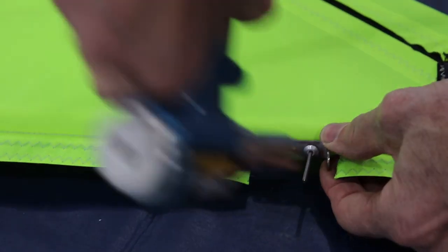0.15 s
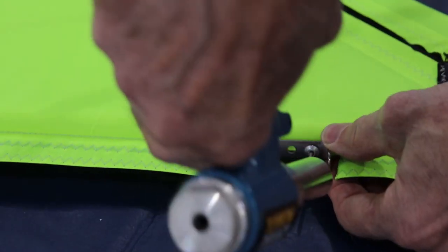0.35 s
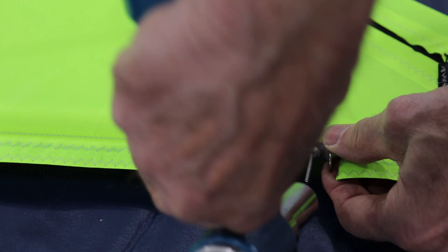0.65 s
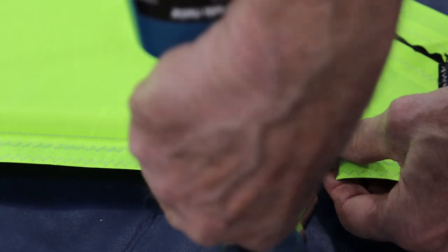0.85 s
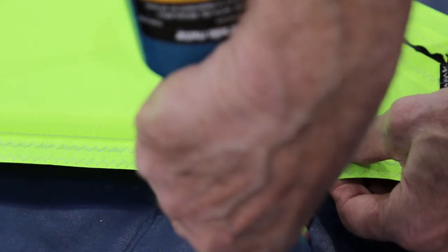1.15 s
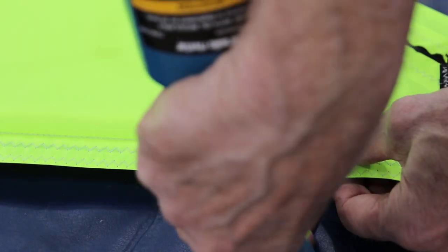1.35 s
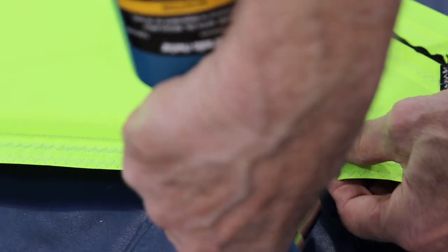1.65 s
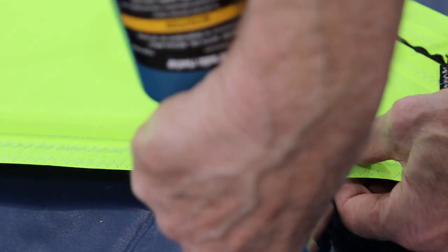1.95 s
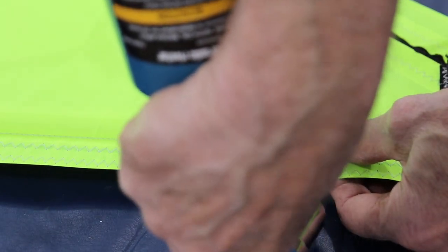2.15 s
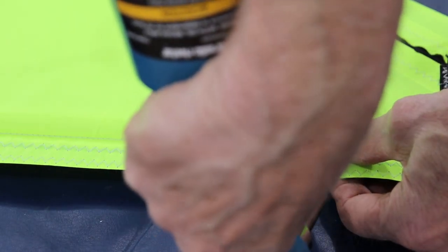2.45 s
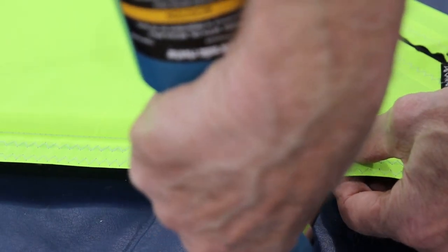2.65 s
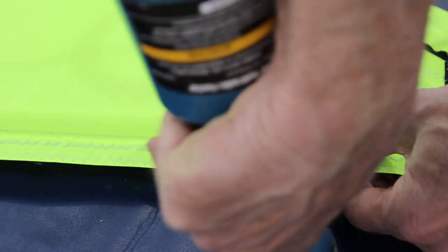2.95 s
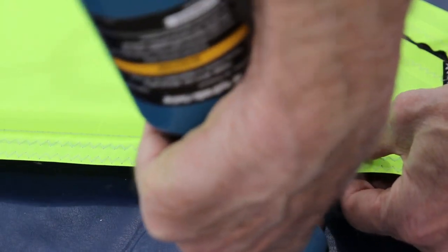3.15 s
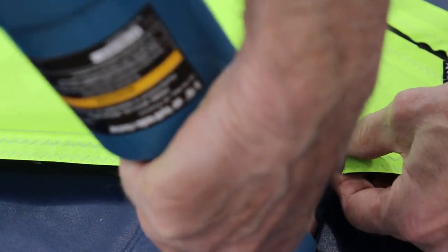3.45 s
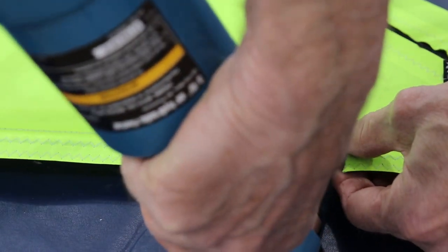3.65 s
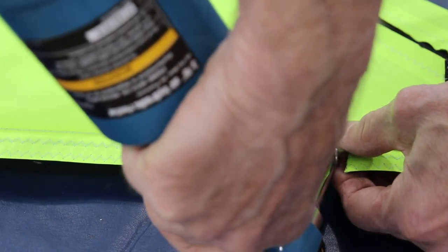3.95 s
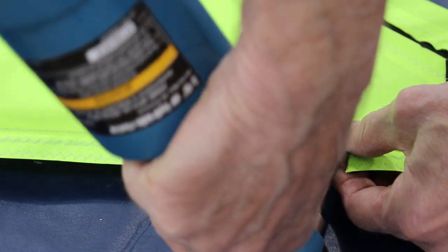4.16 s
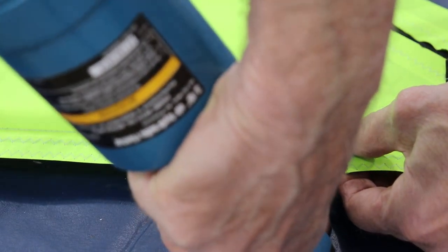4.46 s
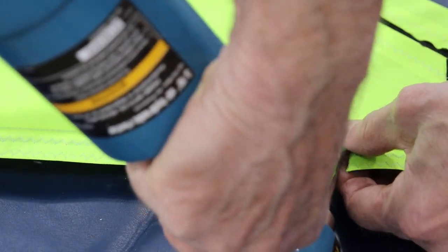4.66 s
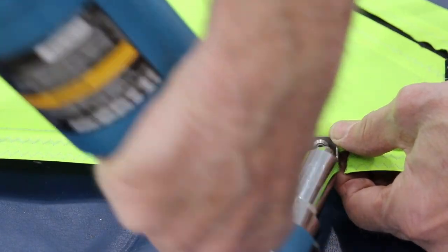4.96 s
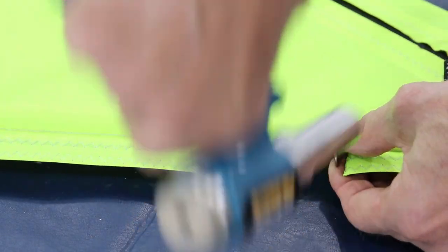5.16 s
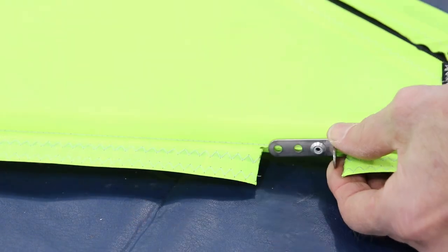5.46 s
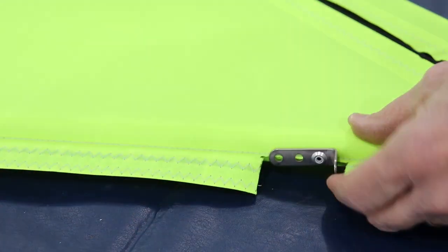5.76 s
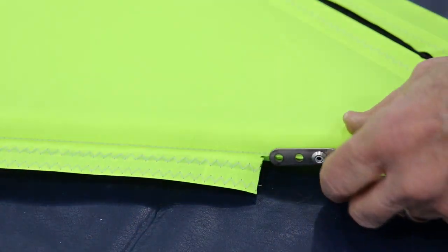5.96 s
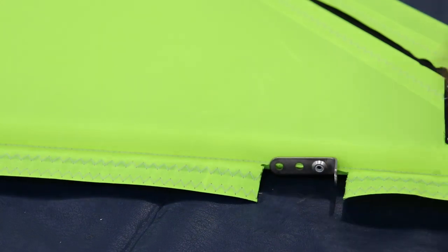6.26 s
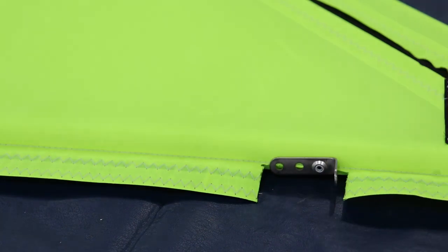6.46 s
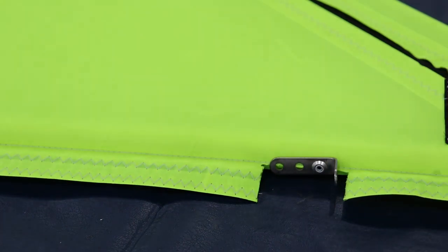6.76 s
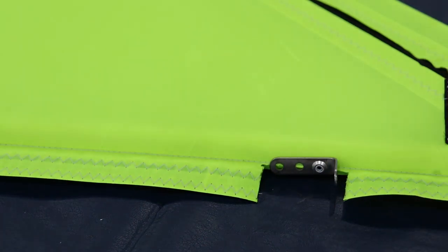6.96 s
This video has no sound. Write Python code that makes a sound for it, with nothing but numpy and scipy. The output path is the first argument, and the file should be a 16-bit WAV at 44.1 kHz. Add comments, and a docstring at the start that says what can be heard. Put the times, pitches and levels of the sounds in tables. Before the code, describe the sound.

An air-powered rivet gun scrapes off a padded table, rattles onto a rivet, puffs, snaps very loudly, then vents in a harsh, shifting hiss.

```python
"""An air-powered rivet gun is dragged off a padded table, fitted on a rivet and fired in a quiet workshop.
Uneven contacts ring the gun as it is handled, and a faint leak whistles until the trigger is taken up.
The valve puffs, the mandrel snaps, and air blows down in the cylinder: shaped noise and decaying modes.
The air then vents past the returning piston while the gun is put down: turbulent noise combed by echoes."""
import sys
import numpy as np
from scipy import signal
from scipy.fft import rfft, irfft, next_fast_len
from scipy.io import wavfile
from scipy.ndimage import uniform_filter1d, map_coordinates

SR = 44100
rng = np.random.default_rng(int(sys.argv[2]) if len(sys.argv) > 2 else 0)


def volts(x):
    """Linear amplitude factor 10**(x/20) for a level x in dB, scalar or array-like."""
    e = np.asarray(x, float) / 20
    return 10 ** e


def int16_out(signal):
    """Quantize to a 16-bit WAV file."""
    q = np.round(np.clip(np.atleast_2d(signal).T, -1, 1) * 32767)
    wavfile.write(sys.argv[1], SR, q.astype(np.int16))


N = 312864
SNAP_S = 4.7419   # the mandrel breaks

# Every spectrum below is a relative power density. Each row: frequency in Hz, level in dB per Hz.
# Every set of resonances: each row: frequency in Hz, bandwidth in Hz, peak gain in dB.


def rms_one(x):
    """Normalisation: scale to unit rms pressure."""
    return x / np.sqrt(np.mean(x ** 2) + 1e-20)


def in_time(rows):
    """Linear interpolation: the columns after the time, at every sample."""
    s, *columns = np.transpose(rows)
    return [np.interp(np.arange(N) / SR, s, c) for c in columns]


def gate(rows, fade_s=0.012):
    """Time window: one between the first and last row, fading outside."""
    first, last = rows[0][0], rows[-1][0]
    return np.interp(np.arange(N) / SR, [first - fade_s, first, last, last + fade_s], [0, 1, 1, 0])


def colour(x, points):
    """Linear filtering: a gain per frequency, interpolated in dB along log frequency."""
    size = next_fast_len(N)
    hz = np.maximum(np.arange(size // 2 + 1) * SR / size, 1)
    point_hz, point_db = np.array(points).T
    gain = volts(np.interp(np.log(hz), np.log(point_hz), point_db))
    return irfft(rfft(x, size) * gain, size)[:N]


def noise(points):
    """Turbulence as Gaussian noise of a given spectrum, rms 1."""
    return rms_one(colour(rng.standard_normal(N), points))


def drift(rate):
    """Slow random fluctuation: noise through a double low-pass pole at rate Hz, rms 1."""
    r = np.exp(-2 * np.pi * rate / SR)
    slow = signal.lfilter([1], [1, -2 * r, r * r], rng.standard_normal(N + SR))
    return rms_one(slow[SR:])


def resonate(x, modes):
    """Modal superposition: parallel two-pole resonances with alternating signs."""
    out = 0
    for k, (hz, width, db) in enumerate(modes):
        r = np.exp(-np.pi * width / SR)
        zeros = [(1 - r * r) / 2, 0, (r * r - 1) / 2]
        poles = [1, -2 * r * np.cos(2 * np.pi * hz / SR), r * r]
        out = out + (-1) ** k * volts(db) * signal.lfilter(zeros, poles, x)
    return out


def piped(points, pipes):
    """Resonant excitation: turbulent noise that also sings in a few resonances."""
    jet = noise(points)
    return jet + resonate(jet, pipes)


def ring(s, hz, db, t60):
    """Free vibration: one struck mode decays by 60 dB in t60 seconds."""
    t = np.maximum(np.arange(N) / SR - s, 0)
    return volts(db - 60 * np.minimum(t / t60, 4)) * np.sin(2 * np.pi * hz * t)


def swell(rows):
    """Transient envelopes (s of top, dB, rise s, fall s): Gaussian rise, exponential relaxation."""
    out = np.zeros(N)
    for s, db, rise, fall in rows:
        i = np.arange(max(int((s - 4 * rise) * SR), 0), min(int((s + 9 * fall) * SR), N))
        t = i / SR - s
        growing = np.exp(-.5 * (t / rise) ** 2)
        dying = np.exp(-np.maximum(t, 0) / fall)
        out[i] += volts(db) * np.where(t < 0, growing, dying)
    return out


# Burst rows, for bursts(): time of the top in seconds, level in dB, rise in seconds (standard deviation),
# fall in seconds (to 1/e), brightness in dB. Its band rows (low, middle, high): offset in dB,
# factor on the rise, factor on the fall.
def bursts(rows, bands, end_s=9.0, fade_s=0.017):
    """Band-wise flow envelopes; brightness lifts the middle band once, the high one twice."""
    s, db, rise, fall, bright_db = np.transpose(rows)
    shut = np.interp(np.arange(N) / SR, [end_s, end_s + fade_s], [1, 0])
    gains = []
    for k, (band_db, slower, longer) in enumerate(bands):
        band_rows = np.c_[s, db + band_db + k * bright_db, rise * slower, fall * longer]
        gains.append(shut * swell(band_rows))
    return gains


def air(gains, jet, flutter_db):
    """Flow noise: low, middle and high bands follow their own gains under a common random flutter."""
    low_hz, high_hz = 3000, 7000
    low = signal.sosfilt(signal.butter(4, low_hz, fs=SR, output="sos"), jet)
    high = signal.sosfilt(signal.butter(4, high_hz, "high", fs=SR, output="sos"), jet)
    middle = signal.sosfilt(signal.butter(3, [low_hz, high_hz], "band", fs=SR, output="sos"), jet)
    flow = sum(gain * rms_one(band) for gain, band in zip(gains, (low, middle, high)))
    return volts(flutter_db * drift(22)) * flow


def echo(x, rows, wobble):
    """Comb interference: a copy arrives by a path of changing length, with wavering strength."""
    lag_ms, strength = in_time(rows)
    strength = np.clip(strength * volts(2.5 * drift(8) - 1), 0, 1)
    return strength * map_coordinates(x, [np.arange(N) - (lag_ms + wobble) * SR / 1000], order=3)


def own_noise():
    """Uncorrelated receiver noise: steady noise for the difference of the two capsules."""
    own_spectrum = [(12, -31), (20, 0), (64, 0), (416, -10), (764, -13.5), (1260, -14.5), (5250, -13.5),
                    (10500, -14), (12000, -20), (16000, -28)]
    return volts(-53) * noise(own_spectrum)


def room_noise():
    """Diffuse background: coloured noise with a very slow, slight change of level."""
    room_spectrum = [(15, -12), (30, -6), (100, -1.5), (300, 4.5), (700, 0.5), (1400, -1), (2500, -5),
                     (5000, -8.5), (10000, -12), (15000, -13), (16500, -14)]
    return volts(-38.5 + 0.54 * drift(2.6)) * noise(room_spectrum)


def leak():
    """Gap flow: turbulent noise passes twice through two pipe resonances."""
    # Level before the gain control. Each row: time in seconds, level in dB.
    leak_level = [(0.16, -40.5), (0.65, -46), (1.25, -42), (1.5, -43.5), (3.25, -45), (3.4, -51),
                  (3.92, -50.5), (4.1, -71)]
    # Resonances of the leaking passage.
    leak_pipes = [(2203, 190, 2), (2630, 500, -2)]
    whistle = resonate(resonate(rng.standard_normal(N), leak_pipes), leak_pipes)
    level_db = in_time(leak_level)[0] + 1.2 * drift(14)
    return gate(leak_level, fade_s=0.045) * volts(level_db) * rms_one(whistle)


def table_shaking():
    """Structure-borne vibration: one low-frequency noise, as bursts under the work and as a steady part."""
    # Bursts. Each row: time of the top in seconds, level in dB, rise and fall in seconds.
    rumble = [(.01, -30.5, .02, 0.044), (.06, -36, .02, 0.25), (3.0, -40, 0.086, 0.11),
              (4.67, -31.5, 0.08, .07), (4.88, -45, .03, .2), (5.454, -48, .06, .03), (6.5, -43, .02, .08),
              (6.6, -46, .03, .05)]
    rumble_spectrum = [(15, 2), (30, 2.5), (100, 3.5), (180, 0), (260, -27)]
    shaking = volts(2.0 * drift(9)) * noise(rumble_spectrum)
    return swell(rumble) * shaking, volts(-50.5) * shaking


def settling():
    """Friction noise: a resonant rustle dies away after the bumps."""
    # Rustles, as burst rows, and their band rows.
    rustles, rustle_bands = [(.19, -35, 0.014, 0.16, -8), (.41, -46.5, .08, 0.1, 7.5),
                             (3.02, -30.5, .004, 0.085, 3.5), (3.18, -49, .04, .2, 0)], [(0.5, 1.1, 0.97), (-9, 1.01, 1.34), (-17.5, 0.68, 0.96)]
    # Spectrum of the rustle and its resonances.
    rustle_spectrum, rustle_pipes = [(88, -26), (150, -1.5), (303, -4), (376, -7), (774, -7.5), (941, -8),
                                     (1340, -12.5), (3840, -22.5), (5460, -27), (16000, -34)], [(5250, 240, 12), (5940, 400, 12),
                                                            (7600, 300, 1)]
    return air(bursts(rustles, rustle_bands), piped(rustle_spectrum, rustle_pipes), flutter_db=2.0)


def dragging():
    """Sliding friction: the gun comes off the table in two pulls that ring table and grip."""
    # Pulls. Each row: time in seconds, level in dB, brightness in dB (once in the middle band, twice in the high).
    pulls = [(0, -13, 0.5), (.032, -14.5, 0.5), (.05, -24, -1), (.082, -36, -3), (.097, -32, -3),
             (.104, -20, -4), (.122, -16.5, -4), (.141, -19, -4), (.149, -36, -3), (.16, -40, 0)]
    # Offsets in dB of the low, middle and high band.
    pull_bands = [0, -15, -29]
    # Spectrum of the friction, and the resonances of table and grip.
    pull_spectrum, pull_modes = [(88, -27), (150, 1), (249, 0.5), (297, -2), (406, -4.5), (578, -6.5),
                                 (821, -9), (1190, 4), (1630, -23), (2400, -12), (3620, -25.5), (5570, -23),
                                 (16000, -61)], [(507, 120, 1), (1250, 170, 8), (1630, 300, 4),
                                                      (2280, 180, 7)]
    drag_db, bright_db = in_time(pulls)
    gains = [gate(pulls) * volts(drag_db + band_db + k * bright_db) for k, band_db in enumerate(pull_bands)]
    return air(gains, piped(pull_spectrum, pull_modes), flutter_db=1.0)


def scuffing():
    """Random impact excitation: dense uneven contacts ring the grip, the barrel and the steel nose."""
    # Gun against table and rivet. Each row: start in seconds, levels of grip, barrel and nose in dB,
    # rise in milliseconds (the top comes one rise after the start).
    scuffs = [(0.087, -25, -32, -40, .5), (0.189, -44, -47, -52, 3), (0.224, -41, -49, -53, 3),
              (1.052, -28, -30, -27, 1.3), (1.124, -34, -34, -43, 5), (1.164, -40, -40, -46, 3),
              (1.232, -34, -35, -42, 5), (1.254, -40, -37, -44, 3), (1.374, -28.5, -33, -42, 1.2),
              (1.408, -29, -24.5, -33.5, 1.1), (1.424, -31, -25, -42, 1.3), (1.443, -35, -33, -48, 1.3),
              (1.689, -37, -42, -47, 3), (2.572, -40, -33, -35.5, 4), (2.609, -39, -39, -39, 3),
              (2.842, -36, -44, -51, 6), (2.863, -30.5, -34, -43, 5), (2.884, -29, -39, -46, 4),
              (3.002, -18, -20.5, -14.5, 1.2), (3.053, -31, -38, -41, 3), (3.599, -38, -39, -44, 3)]
    # Resonances of the hollow grip, the barrel and the nose.
    grip, barrel, nose = [(450, 390, -10), (776, 98, 2.5), (1306, 245, -2)], [(1750, 430, -5.5), (2370, 190, 3.5), (3020, 600, -10.5)], [(3640, 700, 1), (4530, 400, 2), (5540, 920, 8),
                                                        (7500, 2100, 0.5), (10500, 5000, -7),
                                                        (14200, 2700, -29)]
    # Fall of the contact in grip, barrel and nose, in seconds.
    contact_fall = [0.013, 0.0094, 0.0047]
    grain_db = 2.8 * np.minimum(rng.exponential(1, N), 4)
    struck = rng.random(N) < 6000 / SR   # 6000 contacts a second on average
    grains = volts(grain_db) * rng.choice([-1, 1], N) * struck
    s, *levels_db, rise_ms = np.transpose(scuffs)
    rise = rise_ms / 1000
    out = np.zeros(N)
    for modes, db, fall in zip((grip, barrel, nose), levels_db, contact_fall):
        pressure = swell(np.c_[s + rise, db, rise, np.full(len(s), fall)])
        out += resonate(pressure * grains + 1e-18, modes) / np.std(resonate(grains, modes))
    return out


def knocks():
    """Impulse response: ticks crack once and ring a few partials for milliseconds, thuds a few slow cycles."""
    # Small steel parts. Each row: time in seconds, ring level in dB, pitch in Hz,
    # crack level in dB ahead of its high-pass.
    tick_rows = [(2.9974, -21, 8600, -22), (3.0025, -16, 10500, -12), (5.0035, -21, 8540, -22),
                 (5.0795, -20, 8570, -20), (6.6436, -32, 9000, -15), (6.6640, -34, 8100, -15),
                 (6.6702, -36, 8100, -19), (6.7298, -19, 9400, -17)]
    # Dull bumps on the table. Each row: time in seconds, starting level in dB, pitch in Hz, t60 in seconds.
    thuds = [(2.997, -15.5, 900, 0.016), (3.04, -32, 164, .05), (3.627, -26.5, 175, 0.026),
             (5.405, -26, 226, 0.06), (6.473, -22.5, 166, .16), (6.474, -27, 300, 0.0434),
             (6.582, -15, 330, 0.021)]
    partials = [(.45, -7.5), (1.0, -1), (1.36, -11)]   # (pitch ratio, dB)
    ticks = sum(ring(s, hz * k, db + partial_db, 0.0097 / k)
                for s, db, hz, _ in tick_rows for k, partial_db in partials)
    crack_s = .00005
    cracks = swell([(s, crack_db, crack_s / 2, crack_s) for s, _, _, crack_db in tick_rows])
    cracks = signal.sosfilt(signal.butter(2, 700, "high", fs=SR, output="sos"), cracks + 1e-18)
    return ticks + cracks + sum(ring(s, hz, db, t60) for s, db, hz, t60 in thuds)


def filling():
    """Duct resonance: air fills the gun after each valve move and sings in its passages."""
    # Fillings, as burst rows, and their band rows.
    fills, fill_bands = [(4.565, -34.5, 0.029, .01, -5), (4.61, -19.5, 0.0069, 0.054, -3.5),
                         (4.68, -31.5, 0.0053, .045, -2)], [(-1.5, 1.01, 0.99), (-7.5, 1.01, 3.5), (-4, 0.92, 3.0)]
    # Spectrum of the flow, and the resonances of the air passages.
    fill_spectrum, fill_pipes = [(59, -40), (100, -11), (381, 2.5), (1100, -6.5), (1800, -14), (2170, -13),
                                 (2520, -18), (4570, -9), (4980, -9), (6990, -12), (8280, -16),
                                 (12400, -25), (16000, -33)], [(2200, 150, 0), (5000, 200, 9), (5600, 200, 4),
                                                      (6850, 300, 10)]
    gains = bursts(fills, fill_bands, SNAP_S - .01)
    return air(gains, piped(fill_spectrum, fill_pipes), flutter_db=-0.5)


def blow_down():
    """Cavity resonance: air blows down in the cylinder, its pressure relaxing exponentially."""
    # The blow-down, as a burst row, and its band rows.
    blow, blow_bands = [(4.87, -16.5, 0.068, .36, 0)], [(0, 0.91, 1), (-7, .9, .7), (-14, 1.1, .36)]
    # Spectrum of the flow, and the resonances of the cylinder.
    blow_spectrum, blow_pipes = [(88, -49), (150, -19), (348, -4.5), (730, -3), (905, -4), (1340, -3),
                                 (1790, -1.5), (5570, -16), (7770, -22), (13400, -44), (16000, -62)], [(900, 100, -4.5), (1775, 240, 9), (2700, 160, -4)]
    return air(bursts(blow, blow_bands, 5.375), piped(blow_spectrum, blow_pipes), flutter_db=1.0)


def exhaust_jet():
    """Directivity of jet noise: it dulls as the port turns aside and the chamber empties."""
    # Spectra with the port facing near, with the port turned aside, and of the last air in a small chamber.
    facing, aside, last_air = [(120, -50), (250, -23), (500, -14), (1200, -7), (1700, -3.5), (2300, -6),
                               (3300, -5.5), (5200, -1.5), (7500, -6), (10500, -4), (13000, -8),
                               (16000, -17.5)], [(120, -55), (200, -24), (401, -17.5), (509, -21),
                                                    (569, -12.5), (883, -10), (1980, -10.5), (2860, -6.5),
                                                    (4200, -7.5), (4950, -3.5), (7010, -12.5),
                                                    (12200, -7.5), (16000, -20)], [(240, -38), (400, -13), (655, -14),
                                                                         (865, -17), (1630, -16),
                                                                         (2150, -3), (3530, -8), (4510, 0),
                                                                         (5780, -11.5), (12900, -6),
                                                                         (16000, -23)]
    # Resonance of the exhaust passage.
    passage = [(4950, 900, -1)]
    # Start and end, in seconds, of the turn and of the change to the last air.
    turn_span, ending_span = [5.8, 6.01], [6.3, 6.42]
    t = np.arange(N) / SR
    turned, ending = np.interp(t, turn_span, [0, 1]), np.interp(t, ending_span, [0, 1])
    jet = np.sqrt(1 - turned) * noise(facing)   # square roots: crossfades of equal power
    jet += np.sqrt(turned * (1 - ending)) * rms_one(piped(aside, passage))
    jet += np.sqrt(ending) * rms_one(piped(last_air, passage))
    return jet


def low_hum():
    """Tonal components: two low tones swell and fade in Gaussian envelopes."""
    # Each row: time of the top in seconds, pitch in Hz, level in dB, half length in seconds.
    hums = [(5.695, 95, -45, 0.074), (5.69, 190.4, -44, 0.063)]
    t = np.arange(N) / SR
    return sum(volts(db) * np.exp(-.5 * ((t - s) / half) ** 2) * np.sin(2 * np.pi * hz * t)
               for s, hz, db, half in hums)


def exhaust():
    """Interference: fixed near echoes and two moving ones comb the venting jet."""
    # Low roar. Each row: time in seconds, level in dB.
    roar = [(5.36, -28.5), (5.44, -17), (5.46, -28), (5.606, -27), (5.794, -24), (6.098, -26.5),
            (6.206, -25), (6.556, -24), (6.61, -37)]
    # Hiss. Each row: time in seconds, level in dB, treble relative to the hiss in dB.
    hiss = [(5.36, -42, -2), (5.39, -25.5, -4.5), (5.446, -13.5, -0.5), (5.46, -19.5, 2),
            (5.488, -16.5, -1), (5.554, -17.5, 5), (5.668, -19, 3), (5.728, -14.5, 0), (5.85, -17, 0),
            (5.99, -17.5, -4.5), (6.052, -20.5, 1), (6.282, -15, -6.5), (6.334, -17.5, -4),
            (6.546, -25, -2), (6.556, -26, 2.5), (6.61, -38, -15)]
    # Last air dying away, as a burst row, and its band rows.
    tail, tail_bands = [(6.622, -39, .008, 0.19, 0)], [(1.5, 1.01, 0.96), (2, 1.01, .7), (-20, 1.01, .5)]
    # Off hand, gun and cloth, coming and going. Each row: lag in milliseconds, rms strength.
    near_echoes = [(.3, .12), (.52, .11), (.76, .14), (.88, .11), (1.3, .1), (1.72, .08)]
    # Off the returning piston. Each row: time in seconds, mean lag in milliseconds, nominal strength 0-1.
    piston = [(5.37, 1.15, .5), (5.46, 1.29, .2), (5.7, 1.27, .2), (5.81, 1.17, .4), (6.0, .99, .5),
              (6.2, .73, .5), (6.42, .455, .45), (6.57, .325, .4), (6.61, .32, 0)]
    # Off a nearer wall as the gun swings away. Each row: as for the piston.
    swing = [(5.58, .72, 0), (5.65, .65, .35), (5.78, .46, .35), (5.88, .31, .3), (5.92, .29, 0)]
    jet = exhaust_jet()
    wobble = .006 * drift(13.4)   # ms
    (roar_db,), (hiss_db, treble_db) = in_time(roar), in_time(hiss)
    gains = gate(hiss) * volts(np.array([roar_db, hiss_db, hiss_db + treble_db])) + bursts(tail, tail_bands)
    jet += sum(strength * drift(6) * np.roll(jet, int(lag_ms * SR / 1000)) for lag_ms, strength in near_echoes)
    combed = jet + echo(jet, piston, wobble) + echo(jet, swing, wobble)
    return low_hum() + air(gains, combed, flutter_db=1.0)


def firing():
    """Sudden release of stored energy: valve puffs, the crack of the breaking mandrel and its ringing modes."""
    # Valve puffs. Each row: time of the top in seconds, level in dB, rise and fall in seconds.
    puffs = [(4.581, -8.5, 0.0058, 0.012), (4.601, -15.5, 0.0071, 0.002), (4.667, -9.5, 0.002, 0.0052)]
    # Spectra of the puffs and of the snap.
    puff_spectrum, snap_spectrum = [(59, -36), (100, -13), (461, -12), (1360, -8), (1720, -13), (8460, 0),
                                    (10200, -8), (15000, -13), (16000, -29)], [(59, -41), (100, -11), (461, -2), (1150, -13),
                                                         (1760, 2), (5080, -13.5), (7450, -10), (9210, -20),
                                                         (16000, -24)]
    # Modes of the mandrel stem and of the jaws. Each row: frequency in Hz, level in dB, t60 in seconds.
    stem, jaws = [(7522, -15, .1), (7526, -24, 1.05)], [(2400, -19, 0.036), (1500, -16, .04), (710, -17, 0.08),
                                   (6250, -33, 0.25)]
    crack = swell([(SNAP_S, 10, .00003, 0.0026)]) * noise(snap_spectrum)
    ringing = sum(ring(SNAP_S, *mode) for mode in stem + jaws)
    return swell(puffs) * noise(puff_spectrum) + crack + ringing


def gain_control(loud, start_db=-14, slope=0.64, release_db_s=14):
    """Dynamic compression: loud peaks pull the gain down at once; it creeps back."""
    climb = release_db_s * np.arange(N) / SR
    level_db = 20 * np.log10(uniform_filter1d(np.abs(loud), size=44) + 1e-9)
    over = slope * np.maximum(level_db - start_db, 0)
    return volts(climb - np.maximum.accumulate(over + climb))


def scene():
    """Superposition of sources: the gun in the middle over room noise, own noise opposite in the channels."""
    shaking_bursts, shaking_steady = table_shaking()
    gun = firing() + filling() + blow_down() + exhaust()
    gun += dragging() + scuffing() + knocks() + shaking_bursts
    quiet = room_noise() + leak() + shaking_steady + settling()
    gain = gain_control(gun)    # the gun's levels are those behind the gain control
    side = gain * own_noise()
    return gun + gain * quiet + side * np.array([[1], [-1]])


def top_cut(x):
    """Nothing passes above the cut-off."""
    return signal.sosfilt(signal.butter(12, 16480, fs=SR, output="sos"), x)


def record(dry):
    """Saturation and band limiting: the input overloads on the snap, then the top is cut."""
    ceiling = .68   # full scale = 1
    clipped = dry / (1 + np.abs(dry / ceiling) ** 6) ** (1 / 6)
    low_pass = signal.cheby2(16, 60, 16400, fs=SR, output="sos")   # 60 dB down from 16400 Hz
    mix = signal.sosfilt(low_pass, clipped)
    return top_cut(mix)


dry = scene()
out = record(dry)
int16_out(out)
```